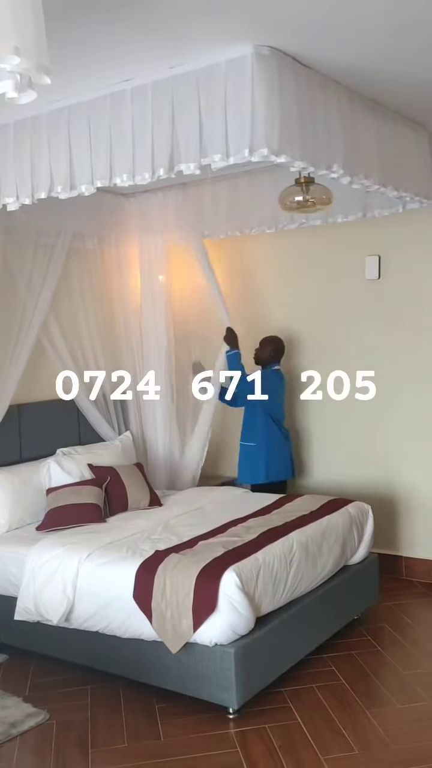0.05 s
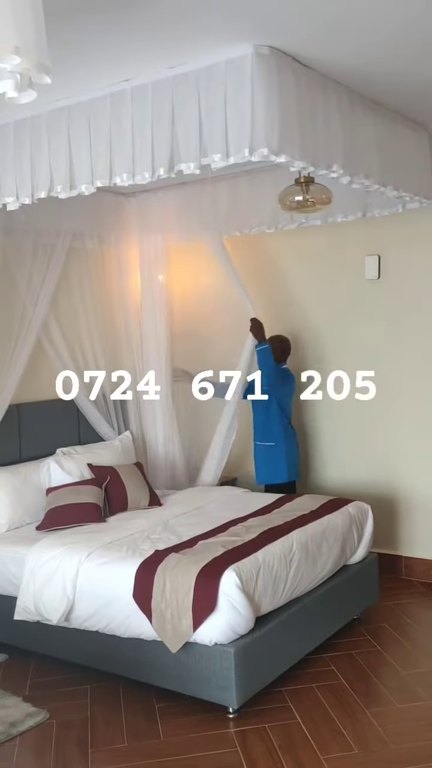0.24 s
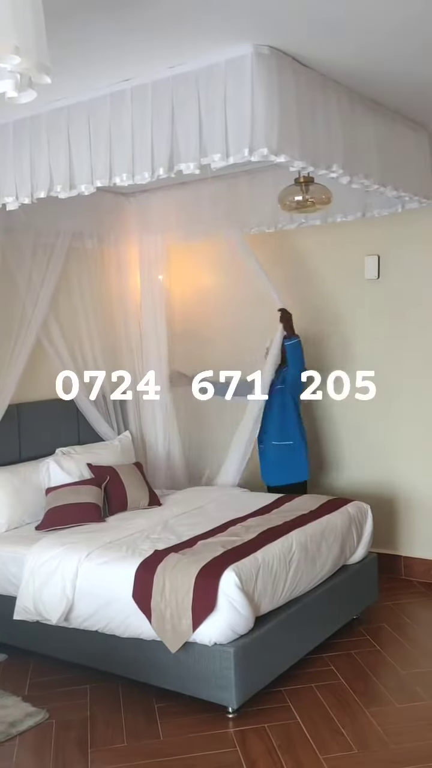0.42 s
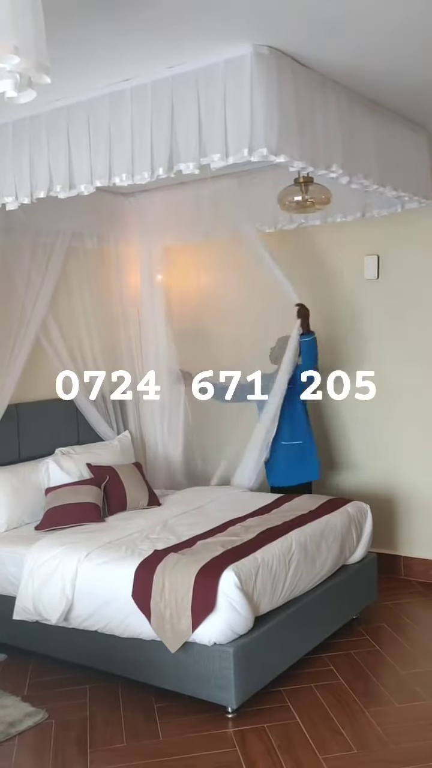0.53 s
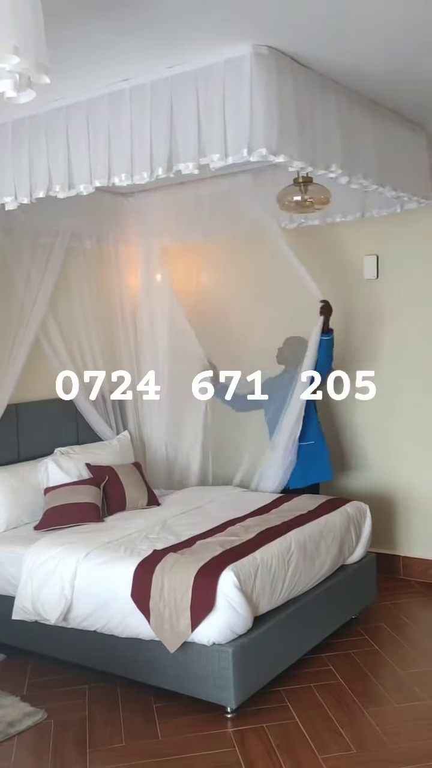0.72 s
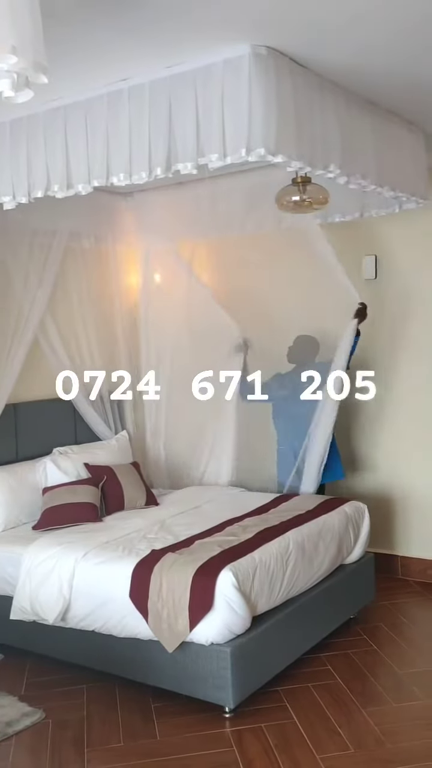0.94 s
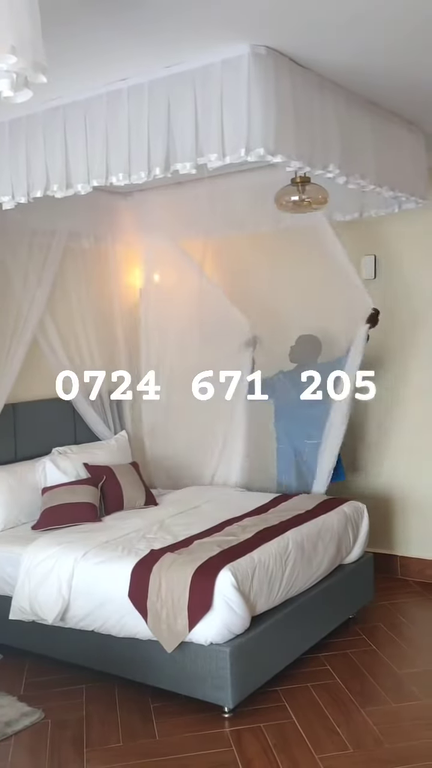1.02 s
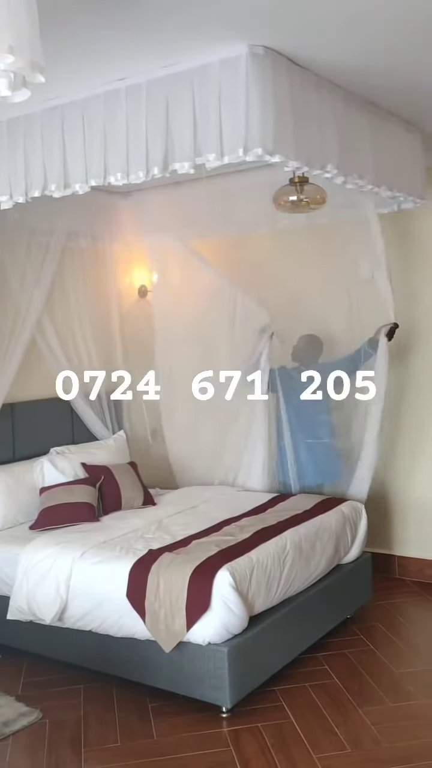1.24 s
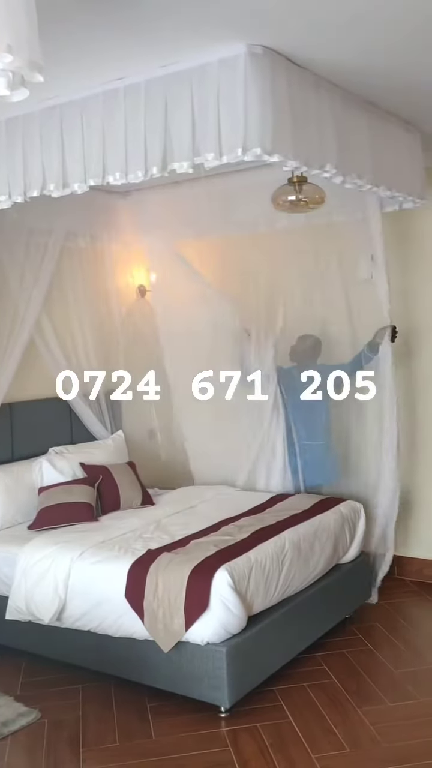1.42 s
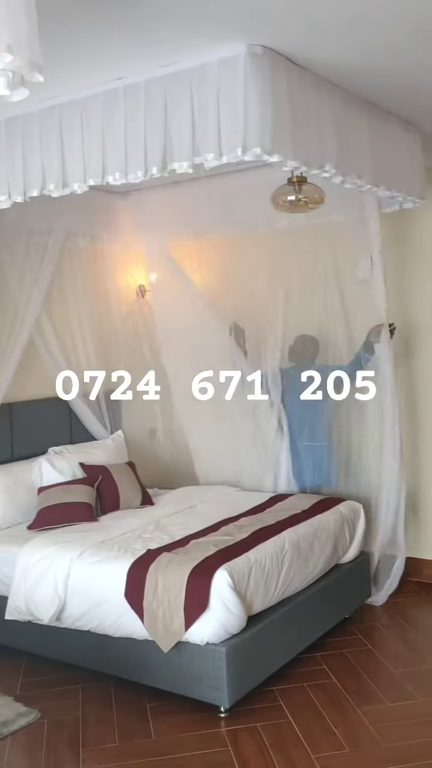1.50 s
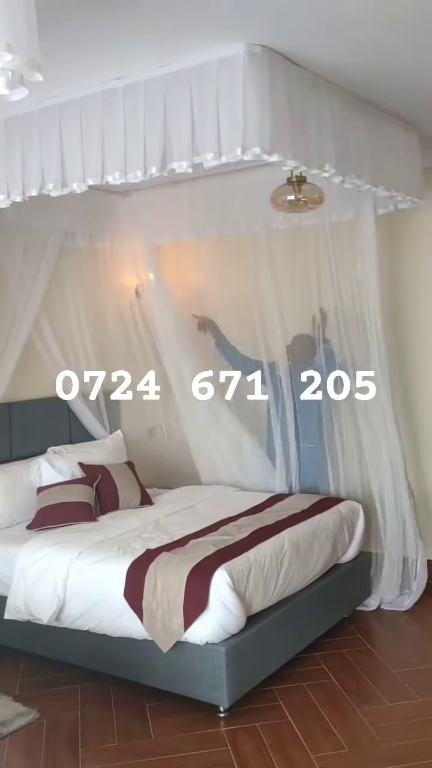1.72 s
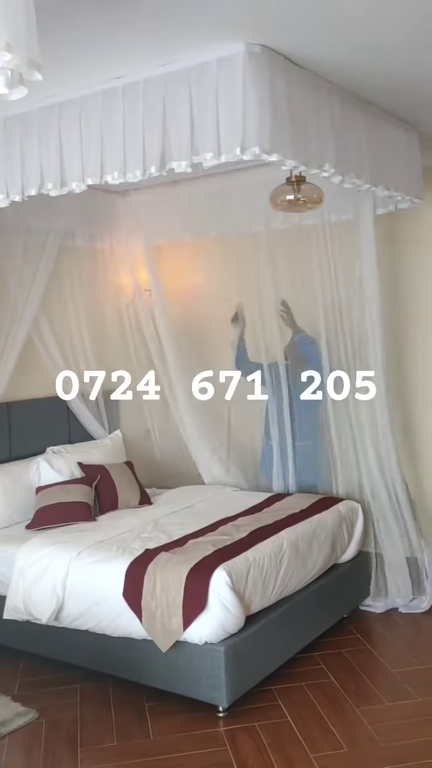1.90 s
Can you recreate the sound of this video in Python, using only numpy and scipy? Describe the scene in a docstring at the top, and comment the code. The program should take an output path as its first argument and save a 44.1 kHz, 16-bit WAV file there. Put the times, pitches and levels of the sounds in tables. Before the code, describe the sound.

A mosquito net is drawn along a ceiling rail, its plastic runners hissing and clicking in one swelling pull. They stop, then shift faintly again, with a few soft footsteps in a quiet, slightly echoing bedroom.

```python
"""Drawing a mosquito net

A net is drawn along its ceiling rail in a quiet bedroom: one long pull that swells as it speeds up
near its end, then a small nudge. Plastic runners catch and slip in a dense spray of tiny clicks.
They hiss brightly, knock together and set the hollow rail ringing.
Soft steps thud on the floor, and the hard room spreads the hiss."""
import sys
import numpy as np
from scipy import signal
from scipy.fft import rfft, irfft
from scipy.io import wavfile
from scipy.ndimage import uniform_filter1d

SR = 44100
rng = np.random.default_rng(int(sys.argv[2]) if len(sys.argv) > 2 else 0)


def dump_mix(stems):
    """Bounce the given channels to the path in sys.argv[1] as a 16-bit WAV at rate SR."""
    frames = np.atleast_2d(stems).T  # one column per channel
    limited = np.clip(frames, -1, 1)  # hard clip at full scale
    pcm = np.round(limited * 32767).astype(np.int16)
    wavfile.write(sys.argv[1], SR, pcm)


N = 85995
TIME = np.arange(N) / SR
HZ = np.fft.rfftfreq(2 * N, 1 / SR)

# How hard the runners rub in the long pull. Each row: time in seconds, level in dB.
PULL = [(0.092, -68), (0.104, -52), (0.168, -54), (0.179, -44.5), (0.205, -47), (0.216, -43),
        (0.329, -42.5), (0.385, -38.5), (0.477, -37.5), (0.641, -40), (0.771, -38), (0.835, -42),
        (0.875, -40), (0.9, -36.5), (1.0, -36), (1.09, -31.5), (1.167, -32), (1.235, -29.5), (1.3, -33),
        (1.375, -36), (1.463, -58), (1.6, -68.5)]
# The net begins to move again. Each row: time in seconds, level in dB.
NUDGE = [(1.6, -103.5), (1.7, -70.5), (1.91, -78), (1.945, -51)]
# Runners knocking together. Each row: start in seconds, strength in dB.
KNOCKS = [(0.126, -35.5), (0.216, -28), (0.2595, -27), (0.315, -31), (0.4612, -24), (0.492, -17.5),
          (0.6085, -20.5), (0.620, -37), (0.742, -21.5), (0.806, -29), (0.8975, -23), (1.102, -22),
          (1.146, -17), (1.233, -23), (1.245, -16), (1.271, -25), (1.279, -22), (1.312, -11.5),
          (1.3555, -15.5)]
# The tone of the plastic. Each row: frequency in Hz, relative level in dB.
HISS_TONE = [(1800, -40), (3000, -6.5), (3400, -10), (3900, -6), (4700, -8.5), (5500, -4), (6100, -1.5),
             (7000, 0), (7400, -3), (8400, -2), (9900, -8), (11500, -9), (13100, -6), (15200, -9),
             (15700, -7), (16100, -32)]
# The top of the hiss comes and goes. Each row: time in seconds, boost or cut in dB.
FIZZ = [(.11, -2), (.17, -6), (.25, -0.5), (.32, -6.5), (.39, 2.5), (.6, 1), (.72, 2.3), (.87, -1),
        (1.05, -1), (1.25, -0.5), (1.33, -0.5), (1.4, -0.5)]
# The rail's broad middle tone. Each row: frequency in Hz, relative level in dB.
BODY_TONE = [(590, -44), (1000, -6), (1260, 0), (1380, -1.5), (2070, 1.5), (2160, 4.5), (2780, -4.5),
             (3600, -16.5), (4680, -40), (7920, -120)]
# The rail's low drone. Each row: frequency in Hz, relative level in dB.
DRONE_TONE = [(125, -41), (180, -12), (250, -14.5), (315, -13), (410, -11), (520, -4.5), (700, -1),
              (1200, -7), (1700, -19.5), (2600, -56.5)]
# The rail's ringing notes. Each row: pitch in Hz, relative level in dB, seconds to fade by 60 dB.
RAIL_NOTES = [(1528, -26.5, 0.089), (2240, -25, 0.19), (2470, -26, 0.056), (2640, -36, 0.21),
              (3125, -20.5, 0.094), (4000, -22, 0.041), (4492, -19.5, .1), (5010, -20, 0.077),
              (5430, -20, 0.086), (6220, -24, 0.08), (6820, -18.5, 0.11), (7054, -17, 0.11),
              (7700, -18, 0.068)]
# How much the runners shake the rail. Each row: time in seconds, then body, drone and ring gains in dB.
RAIL_DRIVE = [(.1, -2, -15.5, 2), (.26, -2.5, -18, 0), (.39, -5, -22, 4), (.48, -7.5, -18.5, 3),
              (.62, -6, -18.5, 2), (.77, -5.5, -16, 1), (.87, -5.5, -15.5, -0.5), (1.06, -5, -17, 0.5),
              (1.22, -7, -16.5, -3), (1.36, -8.5, -18.5, -5), (1.48, -3.5, -25, -4)]
# Steps and shuffles. Each row: start in seconds, seconds until fading, level in dB, pitch in Hz.
STEPS = [(0, 0.026, -65, 55), (0.25, 0.13, -55, 117.5), (0.41, 0.091, -59, 102.5), (.67, 0.083, -67.5, 104),
         (1.177, 0.19, -62.5, 139), (1.55, 0.13, -65, 83), (1.844, 0.079, -62.5, 60)]
# How long the room echoes. Each row: frequency in Hz, seconds to fade by 60 dB.
ROOM_FADE = [(150, 1), (1000, 0.52), (3000, 0.61), (7000, 0.43), (15000, 0.28)]
# Which side the net sounds louder on. Each row: frequency in Hz, left minus right in dB.
BALANCE = [(250, 0.5), (600, -0.5), (1200, -0.5), (1800, -2), (2800, -2), (4200, -6.5), (6400, -10),
           (8000, 6), (9800, 4.5), (12000, -3.5), (15000, -3.5)]
# How alike left and right are. Each row: frequency in Hz, likeness (1 is the same, 0 is unrelated).
LIKENESS = [(60, 1), (250, 0.89), (600, 0.86), (1200, -0.13), (2500, 0.051), (16000, 0.11)]
# The tone of the quiet room. Each row: frequency in Hz, relative level in dB.
AIR_TONE = [(20, -3.5), (45, 0), (70, -14), (120, -7), (200, -6.5), (350, -13.5), (700, -17.5),
            (2000, -15.5), (4000, -14.5), (8000, -19), (10500, -23.5), (16000, -36)]

RUNNER_GROUPS, KNOCK_FADE_S = 2, 0.00065
SLIPS_PER_S, SLIP_SPREAD_DB, RUB_SHARE = 1100, 3.4, 0.49
CHATTER_LOW_HZ, CHATTER_HIGH_HZ, CHATTER_DB = 25, 110, 0.5
HISS_DB, FIZZ_ABOVE_HZ = 0.87, 9400
BODY_DB, NOTE_DRIFT_DB, NOTE_DRIFTS_PER_S = 1, 4.5, 3.77
STEP_RISE_S, STEP_FADE_S, STEP_WIDTH_OCTAVES = 0.012, 0.054, 0.46
DIRECT_DB, EARLY_DB, TAIL_DB = -8.5, 0.5, -6
EARLY_ECHOES_PER_S, EARLY_FADE_S = 900, 0.012
PLACE_S = 0.11  # time the runners spend near one place on the rail
AIR_DB, TREBLE_LIMIT_HZ, OFFSET = -62, 15850, 0.0029


def runners(knocks):
    """One group of runners rubs and knocks; that force sounds both the plastic and the rail."""
    pull_db = np.interp(TIME, *np.transpose(PULL), left=-100, right=-100)
    nudge_db = np.interp(TIME, *np.transpose(NUDGE), left=-100)
    force = friction() * amp(np.maximum(pull_db, nudge_db)) / np.sqrt(RUNNER_GROUPS)
    t = TIME[:SR // 100]
    for start, db in knocks:
        burst = np.exp(-t / KNOCK_FADE_S) * rng.standard_normal(len(t)) / 2
        add(force, start, amp(db) * burst)
    return hiss(force) + rail(force)


def friction():
    """Runners catch and let go: tiny uneven slips over a smooth rub, kept steady on average."""
    sizes = amp(SLIP_SPREAD_DB * np.minimum(rng.exponential(1, N), 4))
    slips = sizes * rng.choice([-1, 1], N) * (rng.random(N) < SLIPS_PER_S / SR)
    rub = rng.standard_normal(N)
    force = np.sqrt(1 - RUB_SHARE) * unit(slips) + np.sqrt(RUB_SHARE) * rub
    force *= amp(CHATTER_DB * chatter())
    return force / np.sqrt(uniform_filter1d(force ** 2, size=2600) + 1e-9)


def chatter():
    """The runners judder as they slide: a quick, random wobble."""
    band = np.exp(-(HZ / CHATTER_HIGH_HZ) ** 2) * (1 - np.exp(-(HZ / CHATTER_LOW_HZ) ** 2))
    return band_noise(band)


def hiss(force):
    """The plastic turns the force into a bright hiss whose top treble comes and goes."""
    sound = colour(force, HISS_TONE)
    high_pass = 1 - 1 / (1 + (HZ / FIZZ_ABOVE_HZ) ** 20)
    top = irfft(rfft(sound, 2 * N) * high_pass)[:N]
    fizz = top * amp(np.interp(TIME, *np.transpose(FIZZ)))
    return amp(HISS_DB) * (sound - top + fizz)


def rail(force):
    """The shaken hollow rail gives a broad middle tone, ringing notes and a low drone."""
    times, *gains_db = np.transpose(RAIL_DRIVE)
    body, drone, ring = (force * amp(np.interp(TIME, times, db)) for db in gains_db)
    return amp(BODY_DB) * colour(body, BODY_TONE) + ringing(ring) + colour(drone, DRONE_TONE)


def ringing(force):
    """Each rail note swells and fades at random, as when runners pass its still points."""
    t, out = TIME[:SR // 5], np.zeros(N)
    for hz, db, fade_s in RAIL_NOTES:
        note = unit(amp(-60 * t / fade_s) * np.cos(2 * np.pi * hz * t)) / np.sqrt(len(t))
        drift = np.interp(TIME * NOTE_DRIFTS_PER_S, np.arange(64), rng.standard_normal(64))
        swell = unit(amp(NOTE_DRIFT_DB * drift))
        out += amp(db) * signal.oaconvolve(force * swell, note)[:N]
    return out


def steps():
    """Each step is a dull, brief rumble of the floor."""
    out = np.zeros(N)
    for start, length, db, hz in STEPS:
        octaves_away = np.log2((HZ + 1) / hz)
        thud = band_noise(np.exp(-0.5 * (octaves_away / STEP_WIDTH_OCTAVES) ** 2))
        t = TIME - start
        rise = np.clip(t / STEP_RISE_S, 0, 1)
        fade = np.exp(-np.maximum(t - length, 0) / STEP_FADE_S)
        out += amp(db) * thud * rise * fade
    return out


def bedroom(sound):
    """The runners travel, so each short, overlapping piece of their sound gets its own echoes."""
    out, hop = np.zeros((2, N)), round(PLACE_S * SR)
    padded = np.pad(sound, (hop, 2 * hop))
    window = np.sin(np.pi * np.arange(2 * hop) / (2 * hop))
    for start in range(0, N + hop, hop):
        piece = padded[start:start + 2 * hop] * window
        heard = signal.fftconvolve(piece[None], echoes(), axes=1)
        for channel, echoed in zip(out, heard):
            add(channel, (start - hop) / SR, echoed[max(hop - start, 0):])
    return stereo(out)


def echoes():
    """A click from one place arrives directly, bounces off ceiling and walls, then dies away."""
    t = TIME[:SR * 2 // 3]
    shape = (2, len(t))
    hz, age, noise = signal.stft(rng.standard_normal(shape), SR, nperseg=256)
    fade = amp(-60 * age / look_up(ROOM_FADE, hz)[:, None])
    tail = signal.istft(noise * fade, SR, nperseg=256)[1][:, :len(t)]
    bounces = rng.standard_normal(shape) * (rng.random(shape) < EARLY_ECHOES_PER_S / SR)
    early = bounces * np.exp(-t / EARLY_FADE_S)
    out = sum(amp(db) * part / np.linalg.norm(part, axis=1, keepdims=True)
              for db, part in [(TAIL_DB, tail), (EARLY_DB, early)])
    out[[0, 1], rng.integers(0, 20, 2)] += amp(DIRECT_DB)
    return out / np.linalg.norm(out[0])


def air():
    """The faint, steady noise of the room."""
    return amp(AIR_DB) * unit(stereo(colour(rng.standard_normal((2, N)), AIR_TONE)))


def stereo(sounds):
    """Blends two sounds into left and right, most alike in the bass."""
    likeness = look_up(LIKENESS, HZ)
    first, second = rfft(sounds, 2 * N)
    mid = first * np.sqrt((1 + likeness) / 2)
    side = second * np.sqrt((1 - likeness) / 2)
    return irfft(np.array([mid + side, mid - side]))[:, :N]


def colour(sound, tone):
    """Shapes a sound with a tone table; plain noise keeps its overall power."""
    db = look_up(tone, HZ)
    gain = unit(amp(np.maximum(db, db.max() - 80)))
    log_gain = np.log(np.concatenate([gain, gain[-2:0:-1]]))
    response = np.exp(np.conj(signal.hilbert(log_gain)))[:N + 1]  # rings after a click, never before
    return irfft(rfft(sound, 2 * N) * response)[..., :N]


def band_noise(band):
    """Noise holding only the frequencies that the band lets through."""
    return unit(irfft(rfft(rng.standard_normal(2 * N)) * band)[:N])


def look_up(table, hz):
    """Reads between a table's rows, spacing frequencies by octaves."""
    row_hz, values = np.transpose(table)
    return np.interp(np.log(hz + 1), np.log(row_hz + 1), values)


def add(mix, start_s, sound):
    """Mixes a sound in at a given time."""
    part = mix[max(round(start_s * SR), 0):][:len(sound)]
    part += sound[:len(part)]


def amp(db):
    """Turns decibels into a multiplier."""
    return 10 ** (np.asarray(db) / 20)


def unit(x):
    """Scales a signal to an average power of 1."""
    return x / np.sqrt(np.mean(x ** 2) + 1e-20)


def scene():
    """Groups of runners heard through the room, with steps and still air."""
    net = sum(bedroom(runners(KNOCKS[k::RUNNER_GROUPS])) for k in range(RUNNER_GROUPS))
    balance = amp(np.array([[0.5], [-0.5]]) * look_up(BALANCE, HZ))
    return irfft(rfft(net, 2 * N) * balance)[:, :N] + steps() + air()


def record(dry):
    """Cuts the very highest treble and shifts the wave slightly off zero."""
    low_pass = signal.firwin(511, TREBLE_LIMIT_HZ, window=("kaiser", 9), fs=SR)
    return OFFSET + signal.oaconvolve(dry, low_pass[None], "same")


dry = scene()
out = record(dry)
dump_mix(out)
```